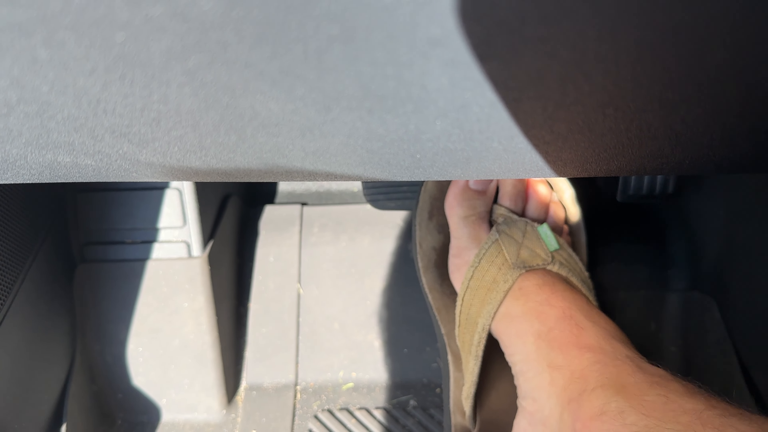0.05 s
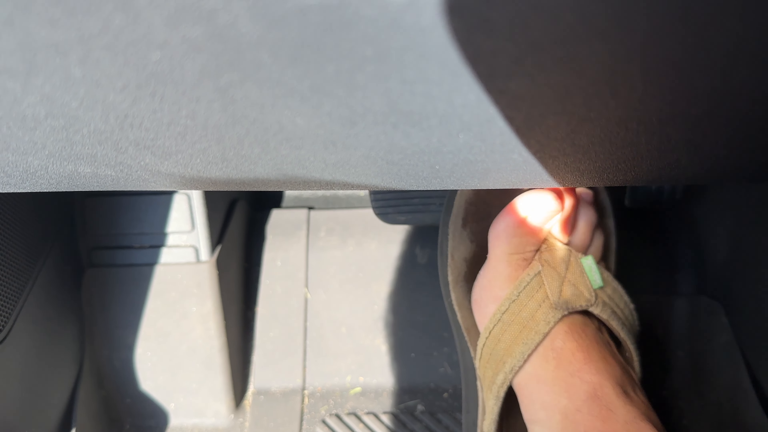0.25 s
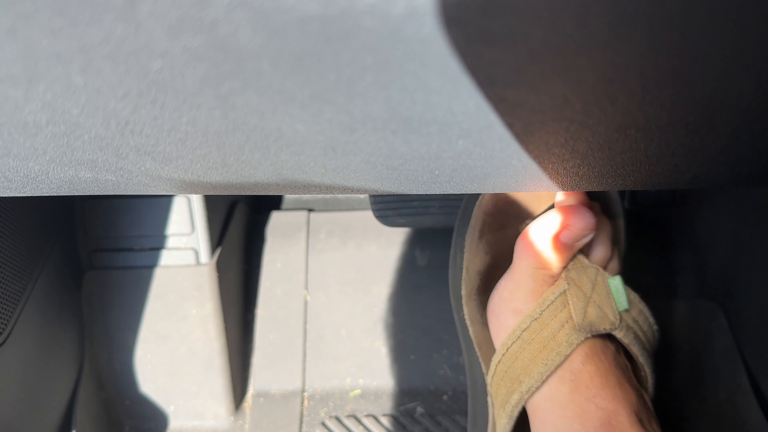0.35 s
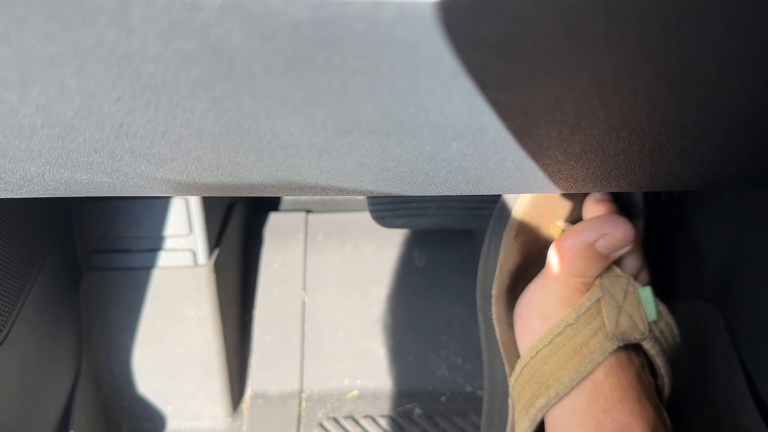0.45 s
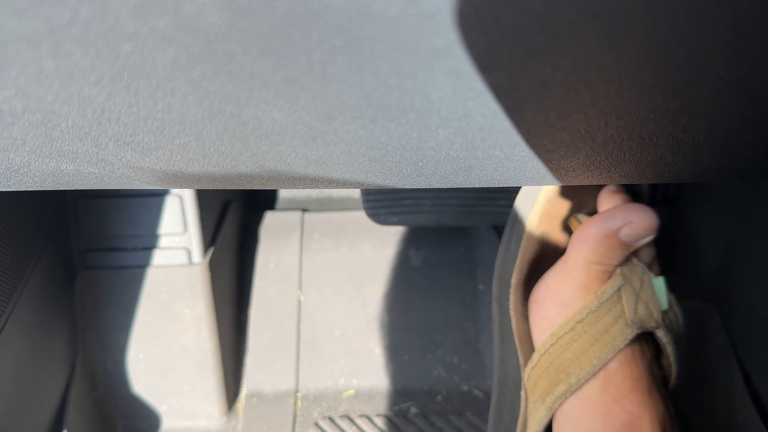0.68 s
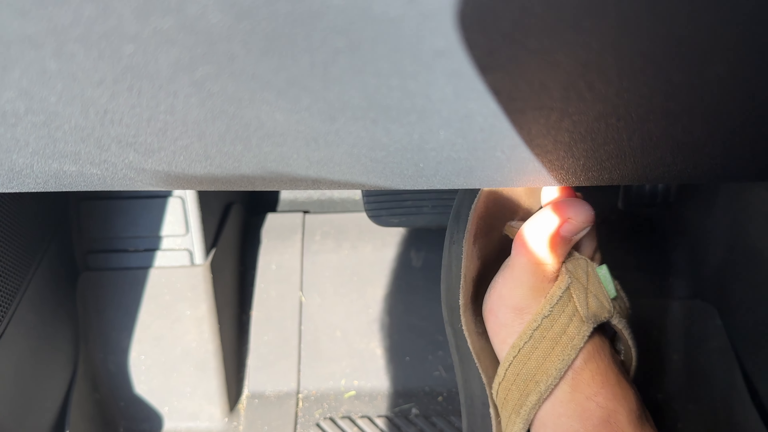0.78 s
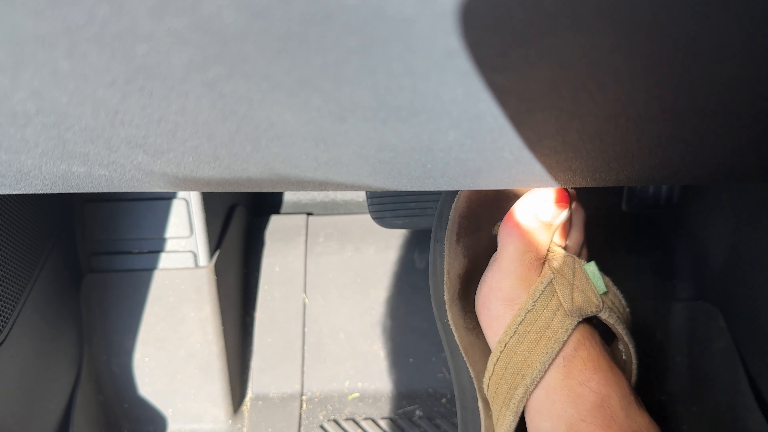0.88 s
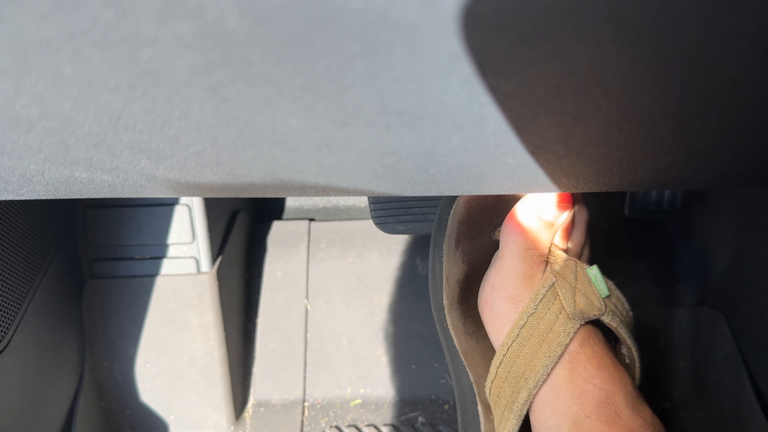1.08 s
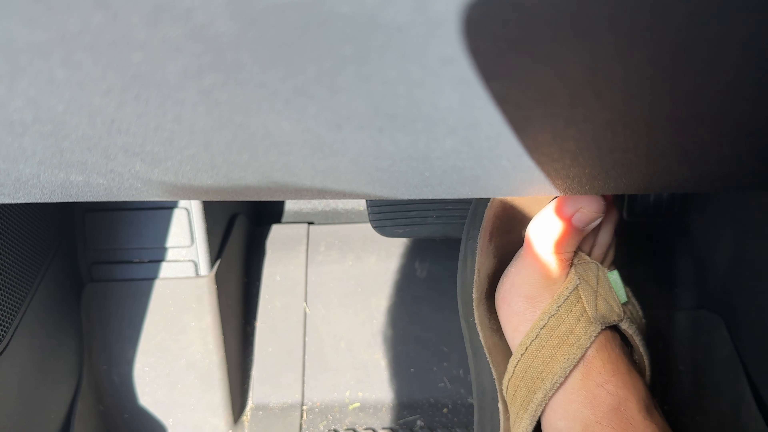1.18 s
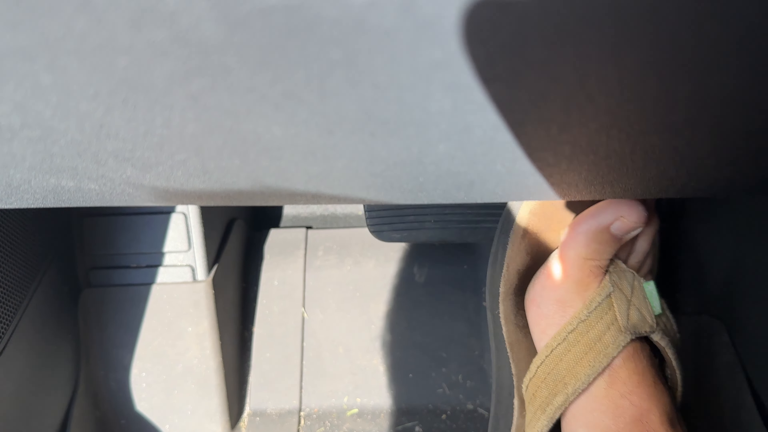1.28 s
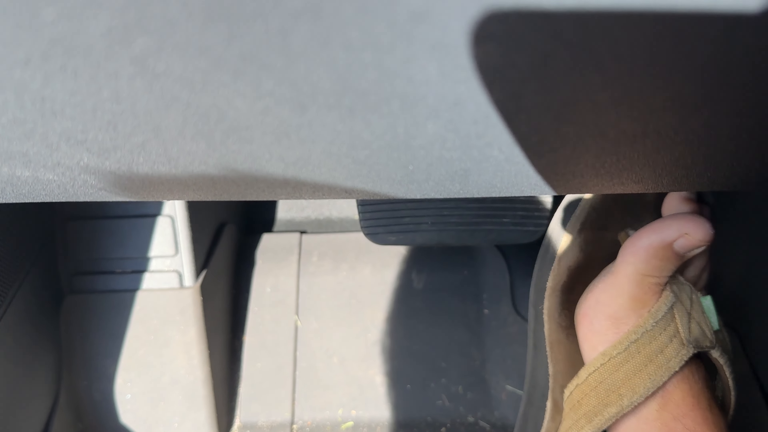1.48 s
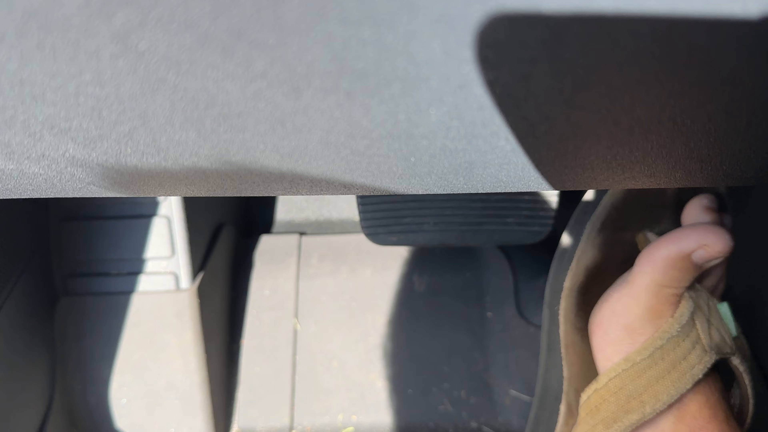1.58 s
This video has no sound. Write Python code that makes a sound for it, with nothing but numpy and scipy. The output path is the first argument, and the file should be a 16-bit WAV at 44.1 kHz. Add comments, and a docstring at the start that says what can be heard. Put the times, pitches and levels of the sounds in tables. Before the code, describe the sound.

A brake pedal clunks loudly as a foot stamps it, with a brief creak and crunch. Softer bumps and one light sandal snap follow, heard close in a parked car's footwell over faint rumble and hiss.

```python
"""A low rumble and faint hiss, heard on a close stereo pair in the footwell of a parked car. Almost at once
a sandalled foot stamps the brake pedal: the pivot groans, the linkage crunches twice and the pedal hits
its stop, booming through the cabin. Softer bumps follow as the foot shifts, and the sandal snaps once.
Far behind are thin high chirps, perhaps an insect outside."""
import sys
import numpy as np
from scipy import signal
from scipy.fft import rfft, irfft
from scipy.io import wavfile
from scipy.ndimage import uniform_filter1d

SR = 44100
rng = np.random.default_rng(int(sys.argv[2]) if len(sys.argv) > 2 else 0)


def store_pcm(level_fs):
    """Save levels as 16-bit WAV."""
    pcm = np.round(np.clip(level_fs, -1, 1) * 32767).astype(np.int16)
    wavfile.write(sys.argv[1], SR, np.atleast_2d(pcm).T)


N = 72765
T = np.arange(N) / SR
HZ = np.fft.rfftfreq(N, 1 / SR)
CABIN_PAN_DB = 1.93  # the cabin's bass leans to the left microphone


def amp(db):
    """Decibels to gain."""
    return 10 ** (np.asarray(db) / 20)


def unit(x):
    """Scales to rms 1."""
    return x / np.sqrt(np.mean(x ** 2) + 1e-20)


def across_spectrum(points):
    """Spreads (Hz, value) points over the spectrum on a log-frequency axis."""
    hz, values = np.transpose(points)
    return np.interp(np.log(HZ + 1), np.log(hz + 1), values)


def pan(db):
    """Gains at the two microphones; positive dB leans left."""
    return amp([[db / 2], [-db / 2]])


def ring(modes):
    """Dying sines of a struck object, each with its own place between left and right."""
    return sum(pan(pan_db) * amp(db) * np.sin(2 * np.pi * hz * T) * np.exp(-np.log(1000) * T / t60)
               for hz, db, t60, pan_db in modes)


def excite(force, response):
    """Drives a ringing body with a force, by convolution."""
    return signal.fftconvolve(np.atleast_2d(force), response, axes=1)[:, :N]


def envelope(start, rise, hold, t60):
    """Rise, hold and exponential release, all in seconds."""
    release = np.exp(-np.log(1000) * np.maximum(T - start - rise - hold, 0) / t60)
    return np.clip((T - start) / rise, 0, 1) ** 2 * release


def hump(hz, centre_hz, falloff_db):
    """A broad emphasis, falloff_db down one octave either side of its centre."""
    return amp(-falloff_db * np.log2((hz + 1) / centre_hz) ** 2)


def glide(curve, jitter):
    """Phase and gain of a wavering tone that follows a (s, Hz, dB) curve."""
    times, hz, db = np.transpose(curve)
    wobble = unit(uniform_filter1d(rng.standard_normal(N), size=150))
    pitch_hz = np.interp(T, times, hz) * (1 + jitter * wobble)
    phase = 2 * np.pi * np.cumsum(pitch_hz * (T > times[0])) / SR
    return phase, amp(np.interp(T, times, db)) * (T > times[0]) * (T < times[-1])


# Likeness of the sound at the two microphones: frequency_hz, correlation (0-1)
MIC_LIKENESS = [(100, 0.98), (300, 0.69), (600, 0.43), (1300, 0), (3000, 0.16), (7000, 0), (13000, 0.82)]
def mic_pair(white, gain):
    """Colours two unrelated signals and makes them as alike as the microphones hear them, at rms 1."""
    a, b = rfft(white)
    angle = np.arccos(np.clip(across_spectrum(MIC_LIKENESS), 0, 1)) / 2
    mid, side = a * np.cos(angle), b * np.sin(angle)
    return unit(irfft(np.array([mid + side, mid - side]) * gain, N))


def noise(colour):
    """Stereo noise at rms 1, shaped by (Hz, dB) points."""
    return mic_pair(rng.standard_normal((2, N)), amp(across_spectrum(colour)))


def narrow_noise(centre_hz, half_width_hz):
    """Stereo noise at rms 1 in one narrow peak."""
    return mic_pair(rng.standard_normal((2, N)), 1 / (1 + ((HZ - centre_hz) / half_width_hz) ** 2))


# Spectra of the rumble and the hiss all around the microphones: frequency_hz, relative_db
RUMBLE_COLOUR = [(20, -40), (32, -24), (48, 3), (68, -0.5), (100, -0.5), (130, -9), (165, -19), (270, -20),
                 (380, -27.5), (600, -44.5), (1200, -66.5)]
HISS_COLOUR = [(200, -3.5), (700, -12.5), (1500, -2.5), (3000, 0), (5000, -3.5), (6400, 1), (8200, -7),
               (11000, -10.5), (15000, -13.5)]
def cabin_ambience():
    """The parked car's room tone: low rumble, even hiss and a faint high whine."""
    rumble = amp(-47) * pan(CABIN_PAN_DB) * noise(RUMBLE_COLOUR)
    hiss = amp(-70.5) * noise(HISS_COLOUR)
    whine = amp(-86) * np.sin(2 * np.pi * 14949 * T)
    return rumble + hiss + whine


# Distant chirps: start_s, length_s, level_db
INSECT_CHIRPS = [(0.443, 0.083, -67.5), (0.71, 0.095, -66), (0.946, 0.068, -65), (1.322, 0.064, -65.5),
                 (1.578, 0.086, -72)]
def insect(pulses_per_s=120, throbs_per_s=8.4):
    """Thin pulsed chirps and a fainter throbbing trill, perhaps from outside the car."""
    gate = sum(amp(db) * np.clip(np.minimum(T - start, start + length - T) / 0.01, 0, 1)
               for start, length, db in INSECT_CHIRPS)
    pulses = unit(1 + 0.41 * np.sin(2 * np.pi * pulses_per_s * T))
    throb = unit(1 + 0.98 * np.sin(2 * np.pi * throbs_per_s * T))
    chirps = gate * pulses * narrow_noise(centre_hz=9314, half_width_hz=120)
    trill = amp(-77.5) * throb * narrow_noise(centre_hz=6460, half_width_hz=320)
    return chirps + trill


# Dull rubbing of the moving pedal, close by: time_s, level_db
PEDAL_RUB = [(0, -80), (.08, -76.5), (.12, -57.5), (.22, -54), (.32, -60), (.42, -54.5), (.48, -68),
             (.8, -65.5), (.9, -64), (1.08, -66), (1.25, -65.5), (1.33, -64.5), (1.4, -75), (1.65, -76.5)]
# Swishes of the sole on the pedal rubber: middle_s, spread_s, level_db
SOLE_SWISHES = [(0.215, 0.037, -68.5), (0.413, 0.042, -67.5), (0.5, 0.023, -66), (0.674, 0.014, -69),
                (0.897, 0.039, -64), (0.969, 0.034, -67.5), (1.13, 0.017, -64.5), (1.555, 0.05, -70.5)]
# Spectra of the rubbing and the swishes: frequency_hz, relative_db
PEDAL_RUB_COLOUR = [(150, -42), (400, 5), (700, -2.5), (1150, -4), (1400, -11), (1800, -13), (2400, -20.5),
                    (5000, -29.5)]
SOLE_COLOUR = [(1000, 1), (3000, -2), (7000, -1), (10800, 2.5), (13000, -7), (15500, -5.5)]
def rubbing():
    """Friction noise, dull from the pedal and bright from the sliding sole."""
    dull = noise(PEDAL_RUB_COLOUR) * amp(np.interp(T, *np.transpose(PEDAL_RUB)))
    strokes = sum(amp(db) * np.exp(-0.5 * ((T - middle) / spread) ** 2)
                  for middle, spread, db in SOLE_SWISHES)
    return dull + noise(SOLE_COLOUR) * strokes


# Modes of the sandal, near the centre of the pair: pitch_hz, level_db, t60_s, pan_db
SANDAL_MODES = [(655, -42, 0.004, 0.13), (1290, -47.5, 0.0032, 1), (3000, -48.5, 0.0013, 1),
                (5300, -52, .0015, 1)]
def sandal_snap(start_s=1.5142):
    """One dry snap: an impulse rings the sandal for a few milliseconds."""
    impulse = signal.unit_impulse(N, round(start_s * SR))
    return excite(impulse, ring(SANDAL_MODES))


# Low shudder of the pedal underfoot: time_s, pitch_hz, level_db
PEDAL_SHUDDER = [(.842, 140, -46), (.852, 127.4, -31), (.863, 102.5, -27.5), (.878, 95.4, -42),
                 (.895, 107.3, -32), (.921, 86.4, -29), (.938, 82, -50), (.95, 85, -62)]
def pedal_shudder():
    """The shifting foot shakes the pedal in a low, sinking tone."""
    phase, gain = glide(PEDAL_SHUDDER, jitter=0.0072)
    return pan(CABIN_PAN_DB) * gain * np.sin(phase)


# Groan of the pivot, just right of centre: time_s, pitch_hz, level_db
PIVOT_GROAN = [(.11, 571, -75), (0.151, 590, -65), (.159, 582, -43), (0.167, 569, -36), (0.179, 577, -42),
               (.197, 566, -51), (0.213, 543, -41.5), (0.227, 580, -50), (.245, 560, -68)]
def pivot_groan():
    """The pivot sticks and slips as the pedal starts to move: a short tone with two weak overtones."""
    phase, gain = glide(PIVOT_GROAN, jitter=0.011)
    overtones = amp(-21) * (np.sin(2 * phase) + np.sin(3 * phase) / 2)
    return pan(-1) * gain * (np.sin(phase) + overtones)


# Close crunches, light ones first: middle_s, length_s, level_db, centre_hz, falloff_db, decay_factor
LINKAGE_CRUNCHES = [(0.1637, 0.0044, -55.5, 2570, 12, 1), (.190, .004, -57, 2480, 7, 0.73),
                    (0.217, 0.036, -58.5, 2500, 2, 1.2), (0.224, 0.0088, -52, 6350, 24, 0.99),
                    (0.2396, 0.016, -30, 5960, 0.48, 0.8), (0.2648, 0.012, -33, 2540, 1.3, 1.24)]
# Colour and decay of a crunch in the footwell: frequency_hz, relative_db, t60_s
CRUNCH_BANDS = [(400, 6.5, 0.22), (780, 5.5, 0.16), (1380, 0.5, .16), (1990, -6.5, 0.1), (2970, -3, 0.069),
                (3800, -11, 0.083), (5250, -4, 0.048), (6640, -15, 0.095), (8850, -9, 0.036),
                (11400, -21.5, 0.082), (15600, -14, 0.033)]
# Bracket and return spring at the loudest crunch, before its emphasis: pitch_hz, level_db, t60_s
BRACKET_MODES = [(927, -47.5, 0.57), (1148, -34.5, 0.054), (1717, -35, 0.085), (1770, -36.5, 0.1),
                 (2193, -42, 0.085), (2550, -44, 0.11), (3240, -42.5, 0.026), (4350, -48.5, 0.081),
                 (4925, -48, 0.091), (5320, -46, 0.046), (7680, -49, 0.076), (8650, -57, 0.076),
                 (9400, -44, 0.028), (9560, -66, 0.018), (10910, -42.5, 0.042)]
def linkage_crunch(slips_per_s=6000, smear=0.57):
    """Bursts of tiny slips rattle through the footwell, treble dying first, and ring the bracket."""
    band_hz, band_db, band_t60 = np.transpose(CRUNCH_BANDS)
    colour = amp(across_spectrum(list(zip(band_hz, band_db)))) * (HZ > 300)
    bands = [np.interp(HZ, band_hz, peak) for peak in np.eye(len(band_hz))]  # overlapping triangles
    loudest_db = max(row[2] for row in LINKAGE_CRUNCHES)
    out = np.zeros((2, N))
    for middle, length, db, centre_hz, falloff_db, decay_factor in LINKAGE_CRUNCHES:
        slips = unit(rng.standard_normal((2, N)) * (rng.random(N) < slips_per_s / SR))
        slips += smear * rng.standard_normal((2, N))
        spectrum = rfft(mic_pair(slips, colour * hump(HZ, centre_hz, falloff_db)))
        start, rise, hold = middle - length / 2, length / 2, length / 4
        for band, t60 in zip(bands, band_t60):
            out += amp(db) * irfft(spectrum * band, N) * envelope(start, rise, hold, t60 * decay_factor)
        for hz, mode_db, t60 in BRACKET_MODES:
            # each microphone catches the mode at a slightly different phase
            tone = np.sin(2 * np.pi * (hz * T + rng.random() + 0.3 * rng.random((2, 1))))
            gain = amp(db - loudest_db + mode_db) * hump(hz, centre_hz, falloff_db)
            out += gain * tone * envelope(start, rise, hold, t60)
    return pan(0.5) * out


def push(time_s, spread_s):
    """A bell-shaped push of unit area; the wider it is, the duller the blow."""
    bell = np.exp(-0.5 * ((T - time_s) / max(spread_s, 1 / SR)) ** 2)
    return bell / bell.sum()


# Blows of the pedal on the car body: time_s, strength_db, contact_ms, play_share (0-1 of the bass lost)
PEDAL_BLOWS = [(.1635, -21.5, 0.83, .3), (0.2306, -6.5, 0.52, 1), (.2385, -9.5, 0.21, 1),
               (0.245, 1, 0.24, 0.6), (0.2628, -15.5, 0.13, 1), (0.2723, -2, 0.055, 0.7),
               (0.276, 4.5, 0.5, 0.16), (0.2827, 10, 1.01, 0.17), (0.2954, 11.5, 1.29, 0.42),
               (0.3073, -1.5, 0.56, 0), (.840, -18.5, 0.59, 0.8), (0.9021, -21, 0.48, 0.6),
               (0.9155, -11, 1.3, .2), (0.9636, -12.5, 1.15, 0.36), (1.222, -26.5, 0.64, 0.5),
               (1.489, -40, 0.88, 0.4), (1.5147, -32, 0.59, 0.1), (1.568, -24.5, 0.49, 0.15)]
# Modes of the floor pan and cabin air around the microphones: pitch_hz, level_db, t60_s, pan_db
CABIN_MODES = [(55, -39, 0.5, 8), (82, -38, 0.5, 0.5), (102.3, -36, 0.57, 1.5), (133, -20.5, 0.14, 1.5),
               (164.6, -37, 0.15, -4), (190.1, -24, 0.12, 2.5), (219.4, -32, 0.27, 4.5),
               (269.2, -24.5, .19, -1), (292.7, -30, 0.13, 5.5), (366, -78, 0.15, -1)]
# Modes of the pedal arm, close by: pitch_hz, level_db, t60_s, pan_db
ARM_MODES = [(543, -32.5, 0.14, -14), (579.4, -21, 0.11, 0), (613.5, -31.5, 0.11, 9.5),
             (657.6, -24.5, 0.13, -4.5), (682, -39.5, 0.096, -2)]
def pedal_clunk(play_s=0.0015):
    """Each blow rings the cabin and pedal arm; long contact leaves only boom, springy play thins it."""
    force = sum(amp(db) * (push(time_s, contact_ms / 1000) - play_share * push(time_s, play_s))
                for time_s, db, contact_ms, play_share in PEDAL_BLOWS)
    bass_loss = signal.butter(2, 438, "high", fs=SR, output="sos")  # the arm is too small to radiate bass
    arm = signal.sosfilt(bass_loss, ring(ARM_MODES))
    return excite(force, ring(CABIN_MODES) + arm)


def scene():
    """Everything that reaches the pair in the footwell, from the pedal out to the background."""
    stamp = pedal_clunk() + linkage_crunch() + pivot_groan()
    footwork = pedal_shudder() + sandal_snap() + rubbing()
    return stamp + footwork + insect() + cabin_ambience()


def record(dry, low_cut_hz=44, high_cut_hz=15800):
    """The microphones roll off the deepest bass; a steep filter trims the highest treble."""
    low_cut = signal.butter(3, low_cut_hz, "high", fs=SR, output="sos")
    high_cut = signal.firwin(511, high_cut_hz, window=("kaiser", 9), fs=SR)
    return signal.oaconvolve(signal.sosfilt(low_cut, dry), high_cut[None], "same")


dry = scene()
out = record(dry)
store_pcm(out)
```